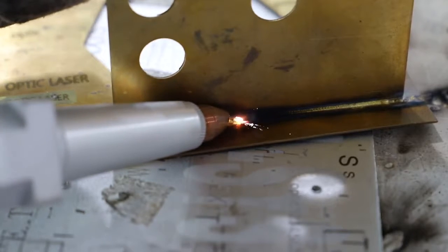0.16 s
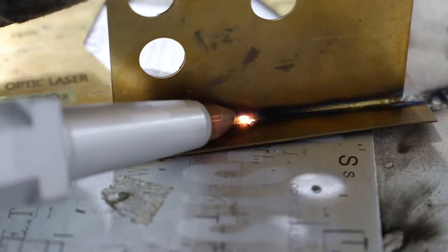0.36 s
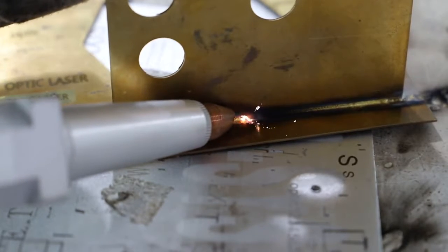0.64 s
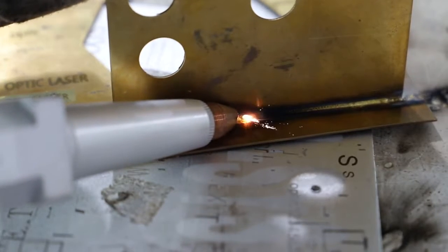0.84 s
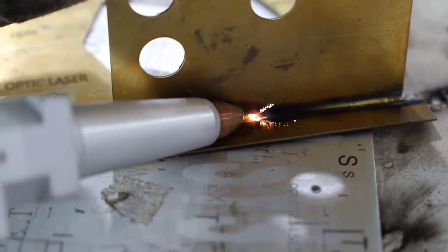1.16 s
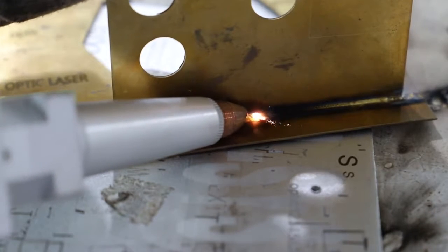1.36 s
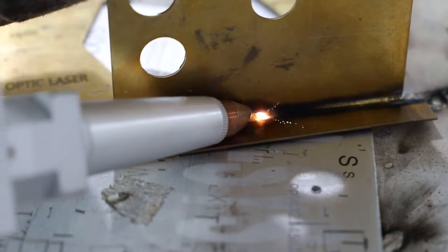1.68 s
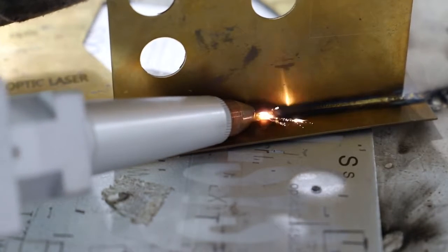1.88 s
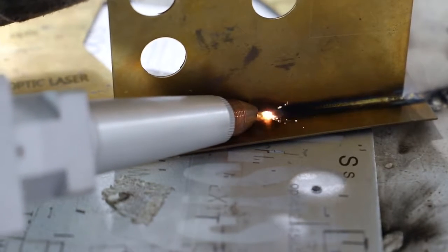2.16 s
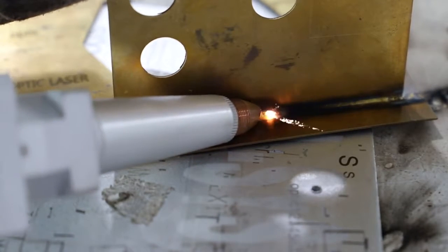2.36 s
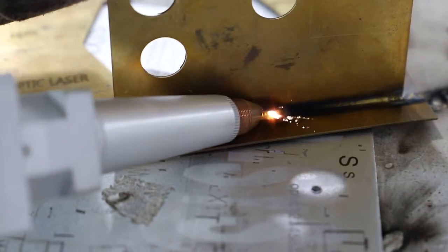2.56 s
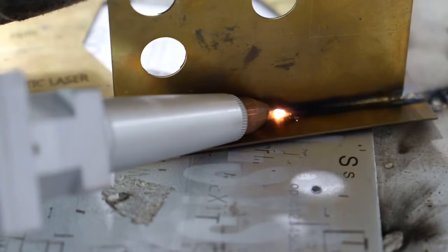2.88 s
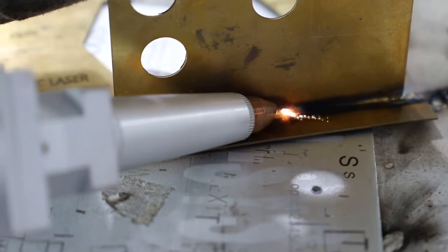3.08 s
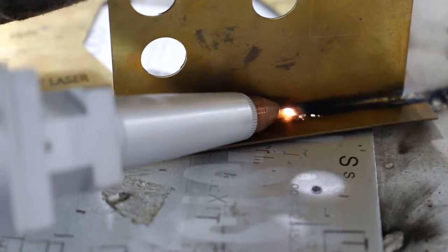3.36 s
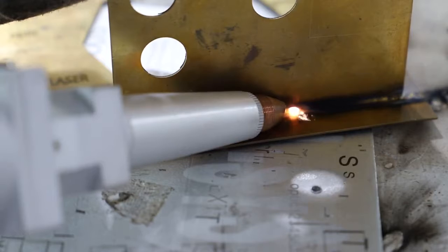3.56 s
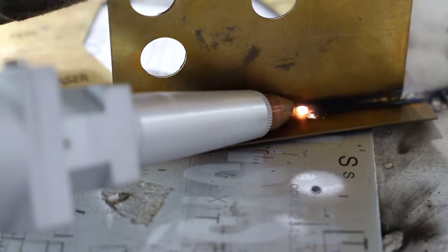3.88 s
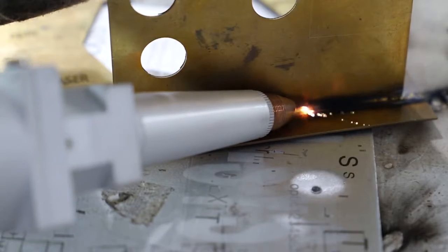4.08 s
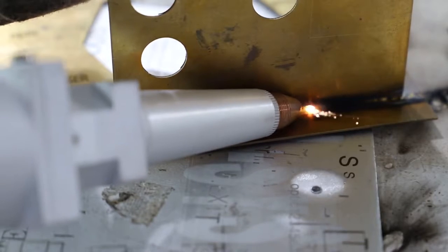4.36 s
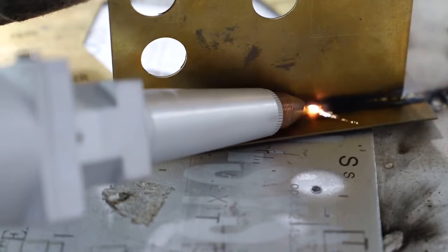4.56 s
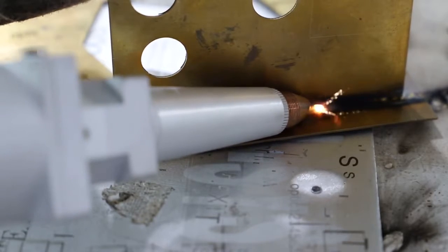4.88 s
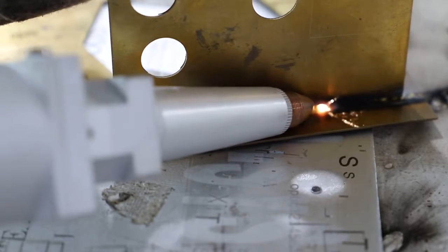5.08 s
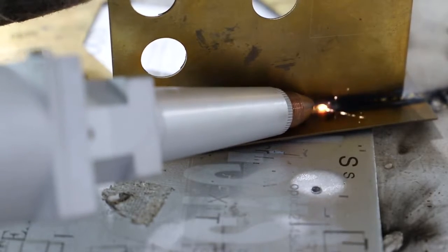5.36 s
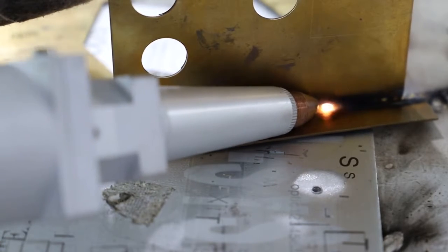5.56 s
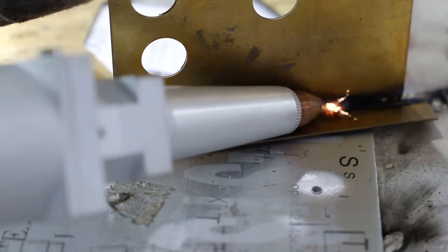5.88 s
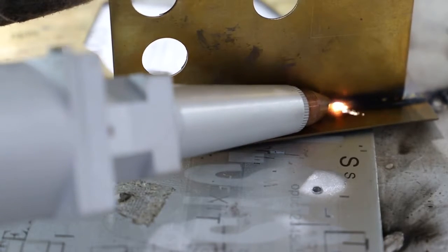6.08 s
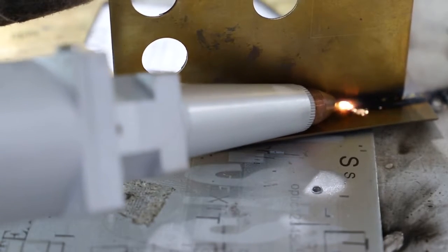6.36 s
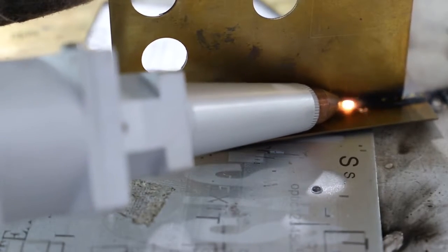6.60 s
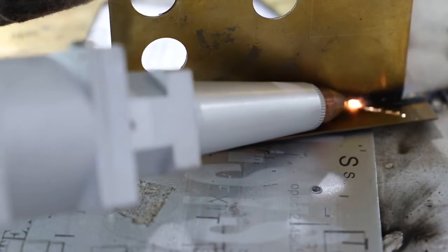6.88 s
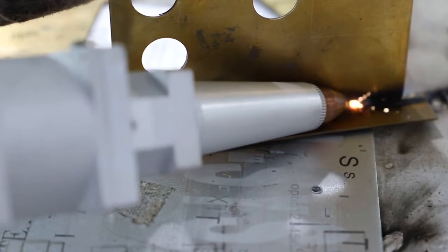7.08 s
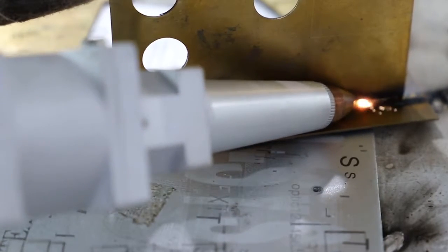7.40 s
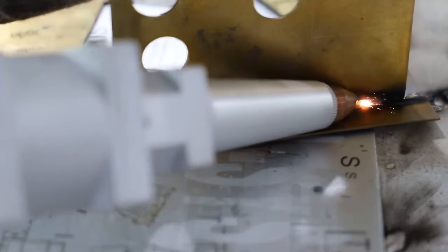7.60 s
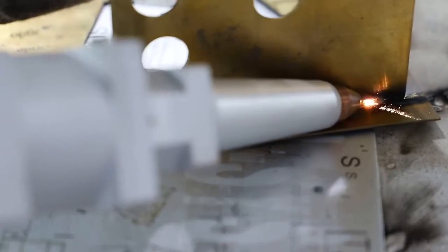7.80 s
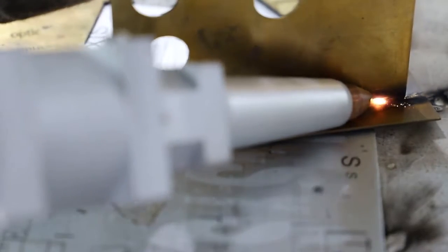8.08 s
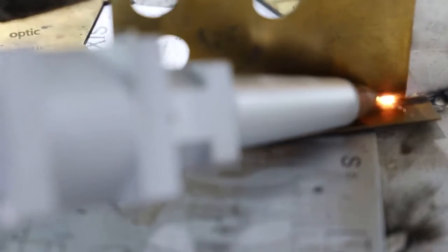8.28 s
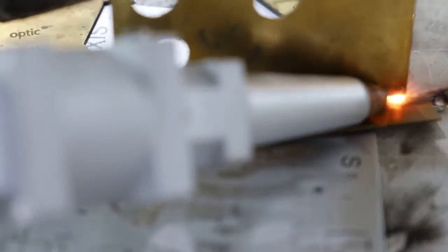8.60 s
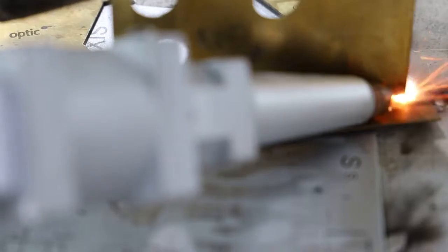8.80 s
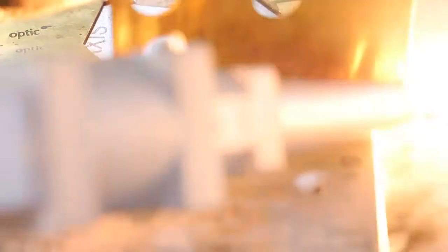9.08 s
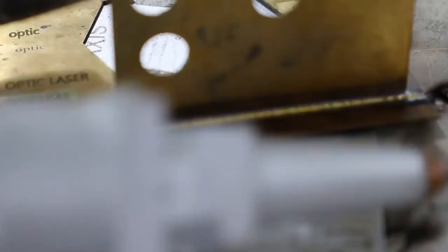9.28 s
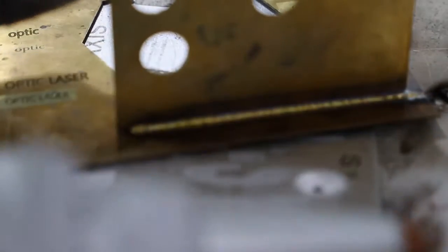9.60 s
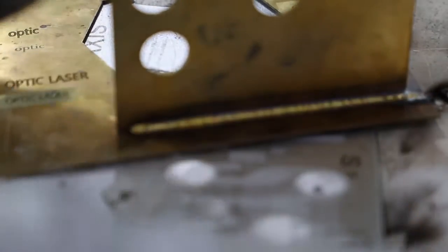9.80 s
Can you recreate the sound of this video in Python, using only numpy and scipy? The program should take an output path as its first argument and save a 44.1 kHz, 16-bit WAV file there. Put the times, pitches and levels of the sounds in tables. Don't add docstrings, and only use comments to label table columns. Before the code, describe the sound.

Close stereo phone pickup of laser welding on metal plates. Sharp, steady sizzling hiss and a noisy whistling gas jet dominate, with rapid buzzing flutter and small spitting swells. At the plate edge a lower, rougher roar joins in; the beam dies in a burst of rapid clicks, the gas briefly whistles on and shuts off, and the workshop's fan hum rises in the quiet.

```python
import sys
import numpy as np
from scipy import signal
from scipy.fft import rfft, irfft
from scipy.io import wavfile
from scipy.ndimage import uniform_filter1d, map_coordinates

SR = 44100
rng = np.random.default_rng(int(sys.argv[2]) if len(sys.argv) > 2 else 0)


def invert_db(level):
    return 10 ** (np.asarray(level, dtype=float) / 20)


def master(y):
    cut = np.clip(np.atleast_2d(y).T, -1, 1)
    pcm = np.round(cut * 32767)
    wavfile.write(sys.argv[1], SR, pcm.astype(np.int16))


N = 438333

# (centre [Hz], width [Hz], level [dB])
TUBE = [(2385, 173, -10.5), (3973, 124, 4), (5507, 154, 4.5), (7050, 170, -.5)]
# (time [s], level [dB])
GAIN = [
    (0, -0.5),
    (9.0, -0.5),
    (9.2, 1.5),
    (9.27, -3),
    (9.33, 0),
    (9.46, 5),
    (9.66, 6),
    (9.71, 10),
    (9.94, 10),
]


def curves(table):
    s, *columns = np.transpose(table)
    return [np.interp(np.arange(N) / SR, s, c) for c in columns]


def over_hz(points):
    hz, value = np.transpose(points)
    return np.interp(np.log(np.fft.rfftfreq(N, 1 / SR) + 1), np.log(hz), value)


def unit(x):
    return x / np.sqrt(np.mean(x ** 2))


def colour(x, points):
    return unit(irfft(rfft(x) * invert_db(over_hz(points)), N))


def ring(x, hz, width):
    return signal.lfilter(*signal.iirpeak(hz, hz / width, SR), x)


def walk(rate):
    k = int(SR / rate)
    steps = np.repeat(rng.standard_normal(N // k + 1), k)
    return 1.057 * uniform_filter1d(uniform_filter1d(steps, k), k)[:N]


def later(x, lag):
    return map_coordinates(x, [np.arange(N) - lag], order=5, mode="nearest")


def ramp(s, length_s):
    return np.clip((np.arange(N) / SR - s) / length_s, 0, 1)


def bell(s, length_s):
    return np.exp(-((np.arange(N) / SR - s) / length_s) ** 2)


def workshop(level_db=-28, broad_db=-4, fan_db=-1, tilt_db=2.0):
    # (frequency [Hz], level [dB per Hz])
    room_spectrum = [(20, -65), (38, -43), (60, -5.5), (130, -8.5), (240, -3), (400, -8.5), (640, -10),
                     (750, -16), (1300, -17), (1700, -21.5), (2100, -40), (4000, -30), (8000, -49),
                     (15500, -54)]
    # (centre [Hz], width [Hz], level [dB])
    duct_modes = [(80, 10, -12), (133.6, 18, -13), (164, 16.7, 4.5), (235, 15, -12), (303.8, 15.7, 2),
                  (328, 31, -11.5), (620, 17, -15.5), (1136, 14, -20.5), (1417, 210, -22.5)]
    # (frequency [Hz], likeness [0-1])
    port_likeness = [(60, 1), (130, 0.99), (290, 0.95), (640, 0.78), (1410, 0.33), (3100, 0.25),
                     (6820, 0.1), (15000, 0.05)]
    likeness = np.clip(over_hz(port_likeness), 0, 1)
    mid, side = rfft(rng.standard_normal((2, N)))
    shared, apart = np.sqrt(1 + likeness) * mid, np.sqrt(1 - likeness) * side
    air = irfft([shared + apart, shared - apart], N)
    fans = unit(sum(invert_db(db) * ring(air, hz, w) for hz, w, db in duct_modes))
    both = invert_db(broad_db) * colour(air, room_spectrum) + invert_db(fan_db) * fans
    return both * invert_db(level_db + np.array([[tilt_db], [-tilt_db]]) / 2)


def scatter(x, t60_s=0.14, shift_rate_hz=4):
    # (frequency [Hz], level [dB])
    reflection = [(500, 8), (2000, 5.5), (3000, 3), (4000, 4.5), (6200, 1.5), (7500, 3.5), (9500, 16),
                  (11000, 8.5), (15000, 20)]
    t = np.arange(int(.4 * SR)) / SR
    tails = rng.standard_normal((2, 2, len(t))) * invert_db(-60 * t / t60_s)
    tails /= np.sqrt(np.sum(tails ** 2, axis=2, keepdims=True))
    x = irfft(rfft(x) * invert_db(over_hz(reflection)), N)
    turn = 2 * np.pi * np.cumsum(shift_rate_hz * (1 + walk(2) / 2)) / SR
    paths = [x * np.sin(turn), x * np.cos(turn)]
    return sum(signal.fftconvolve(p[None], tail, axes=1)[:, :N] for p, tail in zip(paths, tails))


def ports(gun, lag, pan_db, plate, split_hz=8200, body_share=0.51, tip_tilt_db=3.5):
    # (delay at left port [s], delay at right port [s])
    plate_delays = (.000256, .000266)
    f = np.fft.rfftfreq(N, 1 / SR)
    tip = irfft(rfft(gun) / (1 + (split_hz / (f + 1)) ** 20), N)
    body = gun - tip
    left, right = (tip + plate * later(tip, s * SR) for s in plate_delays)
    left = later(body, body_share * lag) + invert_db(tip_tilt_db) * later(left, lag)
    return np.array([left * invert_db(pan_db / 2), (body + right) * invert_db(-pan_db / 2)])


def nozzle(top_db, beam_db, sharpen, flutter_db=-0.35):
    top_centres = [8600, 10500, 12350, 14000, 15400]
    # (width [Hz], level [dB])
    top_modes = [(330, -20.5), (550, -15.5), (740, -16), (600, -23), (500, -47)]
    gas = rng.standard_normal(N)
    low = sum(invert_db(db + b + flutter_db * walk(9)) * ring(gas, hz, w)
              for (hz, w, db), b in zip(TUBE, beam_db))
    top = sum(invert_db(db + flutter_db * walk(15)) * ring(ring(gas, hz, 2.64 * w), hz, 7.0 * w)
              for hz, (w, db) in zip(top_centres, top_modes))
    return later(low + invert_db(top_db) * top, -np.cumsum(sharpen)) / np.std(low)


def wobble(rate_hz=37.4, depth=0.18, second=0.033, drift=0.0138):
    phase = 2 * np.pi * np.cumsum(rate_hz * (1 + drift * walk(2.56))) / SR
    return 1 + depth * np.sin(phase) + second * np.sin(2 * phase)


def plume(sweep, spit_db=2.0, flicker_db=-1.3):
    # (frequency [Hz], level [dB per Hz])
    hiss_spectrum = [(900, -48), (1950, -33), (2200, 6.5), (3300, 2), (4500, 9), (6200, 6), (7800, 1),
                     (8300, 2), (8800, -7.5), (11000, -8), (13000, -11.5), (14500, -18), (15200, -9),
                     (16000, -44)]
    spits = rng.standard_normal(N) * invert_db(spit_db * walk(400) + flicker_db * walk(11))
    return colour(spits * sweep, hiss_spectrum)


def edge_roar(sweep, spit_db=2.1):
    # (frequency [Hz], level [dB per Hz])
    roar_spectrum = [(250, -26), (600, -2), (1200, -1), (1800, -1), (3000, 1.5), (5000, -8), (9000, -44)]
    return colour(rng.standard_normal(N) * invert_db(spit_db * walk(150)) * sweep, roar_spectrum)


def pops():
    flash_times = [9.2175, 9.2425, 9.2550, 9.2675, 9.2800, 9.2925, 9.2991]
    flash_peaks = [-9.5, -6.5, -10, -11, -12, -14, -14]
    t = np.arange(N) / SR
    rise_s, back_s, back, tail_s = .00005, .0006, .85, .000045
    tube_hz, tube_width_hz, tube_db = 820, 480, 4.5
    out = np.zeros(N)
    for s, db in zip(flash_times, flash_peaks):
        span = slice(int((s - .002) * SR), int((s + .006) * SR))
        push = np.exp(-((t[span] - s) / rise_s) ** 2)
        u = np.clip(t[span] - s - back_s, 0, None) / tail_s
        answer = back * np.e * u * np.exp(-u)
        out[span] += invert_db(db) * (push - answer)
    return out + invert_db(tube_db) * ring(out, tube_hz, tube_width_hz)


def scene():
    # (time [s], turn [0-1])
    aim = [
        (0, 0.14),
        (2, .1),
        (4, 0.43),
        (6, 0.66),
        (8, 0.91),
        (9.2, 1.05),
    ]
    # (time [s], level [dB])
    jet = [
        (0, -27),
        (8.5, -26.5),
        (8.75, -27.5),
        (9.2, -29),
        (9.32, -36.5),
        (9.45, -38),
        (9.63, -40),
        (9.72, -56),
        (9.94, -74),
    ]
    # (time [s], level [dB])
    surges = [(.22, 2.5), (.5, 3), (1.19, 3), (1.48, 0.5), (1.609, -0.5), (1.83, 1), (1.98, 2), (3.12, 4),
              (3.27, 1), (3.6, 2), (3.74, 3.5), (4.04, 3.5), (4.46, 3), (4.862, 4), (5.18, 0.5), (5.38, 1),
              (5.9, -0.5), (6.172, 3), (6.52, 0), (6.8, 1.5), (7.502, 2), (7.75, 2)]
    # (at first [dB], per full turn [dB], at the edge [dB],
    # once lifted [dB], as the mouth swings by [dB])
    beaming = [
        (5.5, -5, .3, 7.5, 6.5),
        (1.5, -3, -1.7, 6, -5.5),
        (-0.1, 0.4, -0.3, -1.5, 6),
        (0.2, 0.9, -0.3, -3.5, 2),
        (3, -5.5, 3, 7, 1),
    ]
    edge_s, edge_rise_s, past_edge_s = 8.41, 0.22, 9.0
    beam_off_s, lift_s = 9.25, 0.1013
    swing_s, swing_length_s = 9.425, 0.05

    turn, gas_db, gain = curves(aim)[0], curves(jet)[0], invert_db(curves(GAIN)[0])
    open_end = ramp(edge_s, edge_rise_s)
    edge = open_end - ramp(past_edge_s, edge_rise_s)
    lifted = ramp(beam_off_s, lift_s)
    surge_db = sum(db * bell(s, 0.076) for s, db in surges) + 0.63 * walk(6)
    flare_db = 8 * bell(9.255, 0.035)

    swing, mouth_seen = bell(swing_s, swing_length_s), ramp(9.32, swing_length_s)
    part_lifted = [lifted] * len(TUBE) + [mouth_seen]
    *beam_db, top_db = (db + turn_db * turn + edge_db * edge + lift_db * up + swing_db * swing
                        for (db, turn_db, edge_db, lift_db, swing_db), up in zip(beaming, part_lifted))

    whistle_db = gas_db + 7.0 - 0.33 * surge_db
    hiss_db = gas_db + 2.5 + surge_db + .3 * flare_db - 2 * lifted
    roar_db = gas_db - 13 + 1.35 * surge_db + 3 * turn + 9 * open_end + flare_db - 2 * lifted
    sharpen = .005 * lifted + .006 * (turn - .5)
    sweep = wobble()
    gun = invert_db(whistle_db) * nozzle(top_db, beam_db, sharpen)
    gun = gun + invert_db(hiss_db) * plume(sweep)
    gun = gun + invert_db(roar_db) * edge_roar(sweep)
    gun = gain * gun + pops()

    lag = 2.1 * turn + .4 * lifted
    pan_db = 0.04 - turn + 2.4 * lifted
    plate = 0.12 * (1 - lifted) + bell(8.7, 1)
    near = ports(gun, lag, pan_db, plate)
    wet_db = -11.5 + 5.5 * lifted
    return near + invert_db(wet_db) * scatter(gun) + gain * workshop()


def band_limit(x):
    return signal.sosfilt(signal.butter(12, 15730, fs=SR, output="sos"), x)


def record(dry):
    # (frequency [Hz], level [dB])
    mic_colour = [(20, -14), (45, 0), (11500, 0), (13000, -2.5), (14000, -5), (14900, -8), (16000, -7)]
    # (centre [Hz], width [Hz], level [dB])
    dips = [(4770, 160, -3), (8300, 150, -4), (9650, 280, -4.5), (13480, 260, -6.5), (15200, 400, -4)]
    f = np.fft.rfftfreq(N, 1 / SR)
    dip_db = sum(db * np.exp(-((f - hz) / width) ** 2) for hz, width, db in dips)
    self_noise_db = -63 + curves(GAIN)[0]
    hiss = invert_db(self_noise_db) * rng.standard_normal(dry.shape)
    mix = irfft(rfft(dry + hiss) * invert_db(over_hz(mic_colour) + dip_db), N)
    return band_limit(mix)


dry = scene()
out = record(dry)
master(out)
```